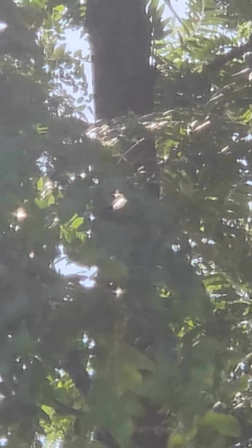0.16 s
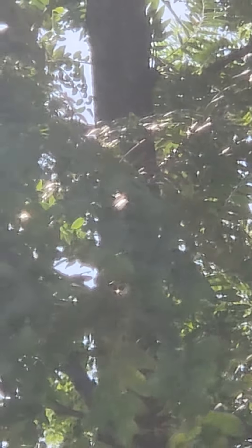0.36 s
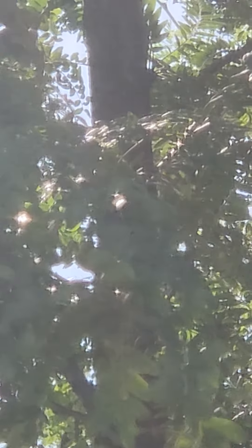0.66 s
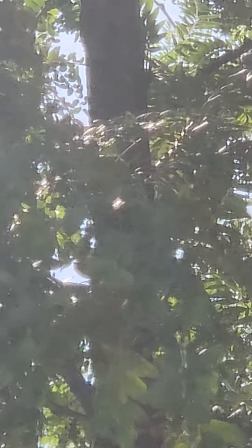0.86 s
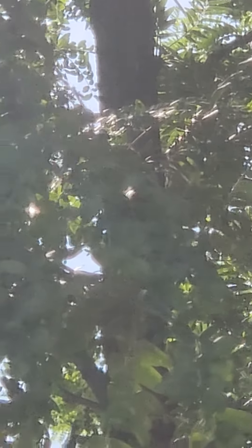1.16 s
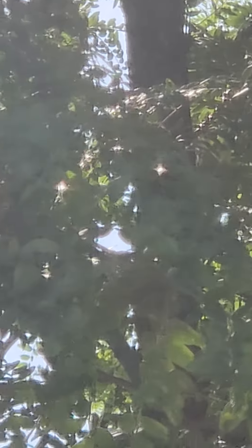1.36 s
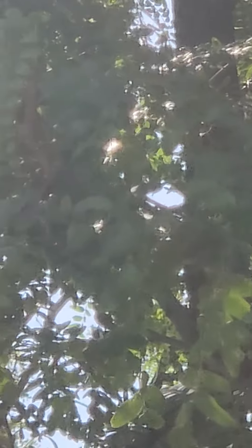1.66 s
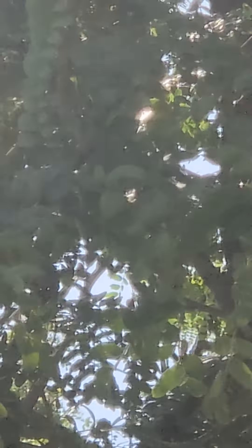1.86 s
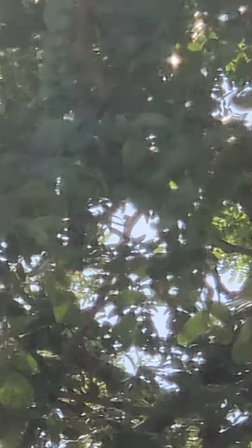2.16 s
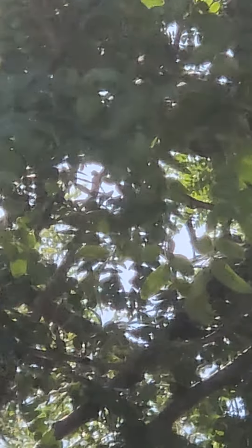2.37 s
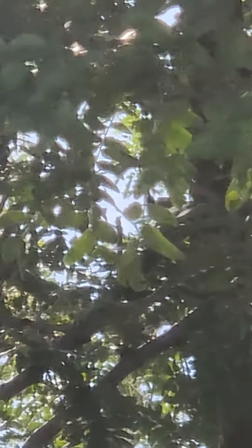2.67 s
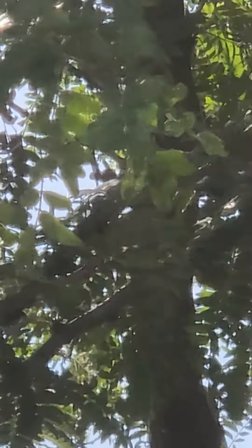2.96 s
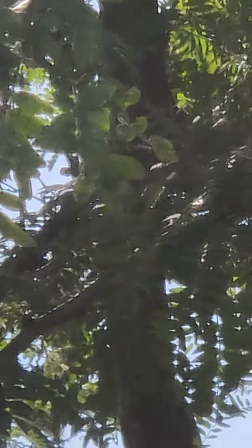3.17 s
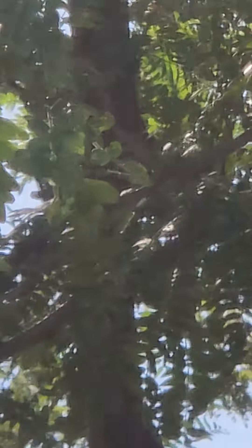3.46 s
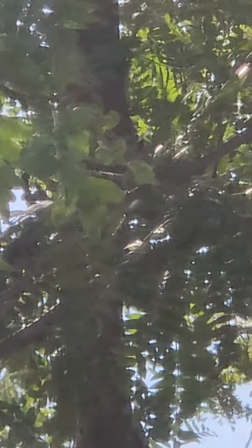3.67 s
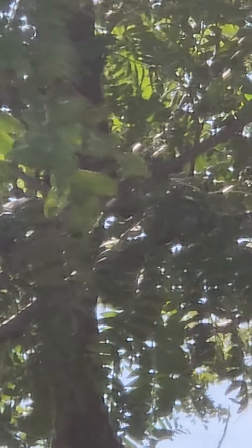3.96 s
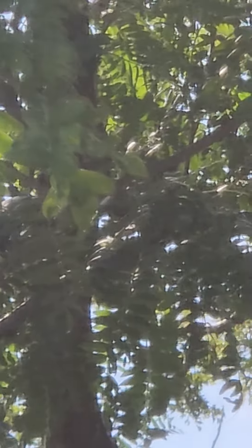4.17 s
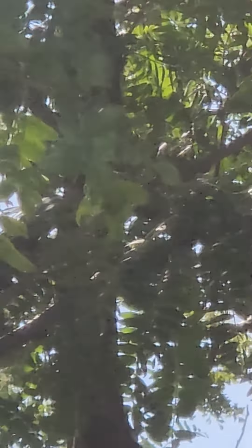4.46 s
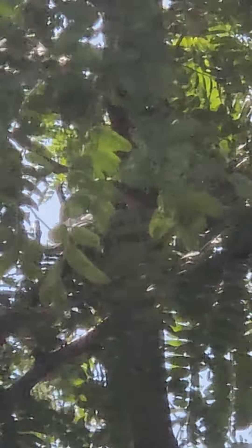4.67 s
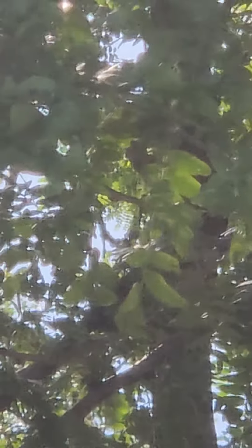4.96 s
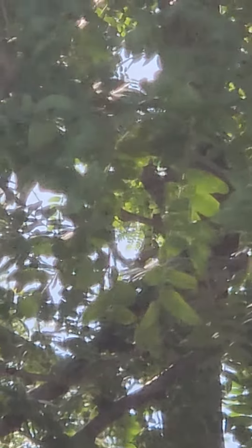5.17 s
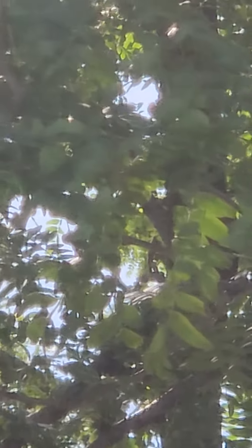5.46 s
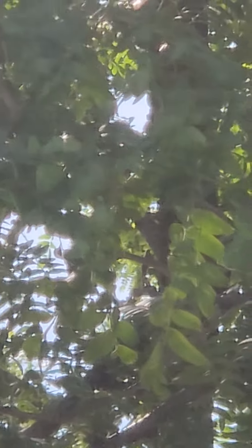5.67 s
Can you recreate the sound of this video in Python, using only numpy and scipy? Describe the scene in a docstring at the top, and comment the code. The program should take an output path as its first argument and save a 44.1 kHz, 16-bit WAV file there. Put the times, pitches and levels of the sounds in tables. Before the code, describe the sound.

A jay screams four times close by, harsh and nasal, over faint pulsing insects and a distant traffic rumble in a wood.

```python
"""Insects pulse and a far bird calls in the foliage over a distant traffic rumble, heard in stereo in a wood.
A second in, a blue jay close to the microphones gives the first of four screams. Each scoops up into a
nasal whistle (the second harmonic in the throat resonance), sags, and breaks into a rasp as the pulses
of the syrinx fall into disorder. Twigs, leaves and trunks scatter the calls back.
At the microphones a sleeve rustles and ticks faintly as the listener turns."""
import sys
import numpy as np
from scipy import signal
from scipy.fft import rfft, irfft, next_fast_len
from scipy.io import wavfile
from scipy.ndimage import uniform_filter1d, minimum_filter1d, map_coordinates

SR = 44100
rng = np.random.default_rng(int(sys.argv[2]) if len(sys.argv) > 2 else 0)


def pcm_store(signal):
    """Save signal as 16-bit PCM."""
    levels = np.round(np.clip(np.atleast_2d(signal), -1, 1) * 32767)
    wavfile.write(sys.argv[1], SR, levels.astype(np.int16).T)


N = 256220
T = np.arange(N) / SR

# One row a scream: (start [s], length [s], top pitch [Hz], sag [Hz], sag after [s],
# pulses group in fours after [s], voice breaks after [s], added roughness [0-1], relative rasp [dB],
# relative sizzle [dB], sizzle swell [dB], swell peaks after [s], fundamental [dB])
JAY_SCREAMS = [(1.06, 0.42, 1639, 29.55, 0.13, 0.06, 0.25, 0.31, -30, -28, 8, .26, -34.5),
               (2.85, 0.37, 1648, 40.4, 0.18, .22, 0.24, 0.87, -32, -28, 5, 0.27, -34),
               (3.579, 0.38, 1637, 36, .194, 0.12, .19, 0.73, -27.5, -23, 5, 0.24, -27.5),
               (5.42, .380, 1668, 54.4, 0.13, .205, 0.24, 0.65, -30, -23, 2.5, 0.18, -29.5)]
# The whistle, one curve a scream: (time [s], relative level [dB])
WHISTLE_CURVES = [
    [(1.079, -15), (1.095, -12.5), (1.235, -14), (1.247, -7.5), (1.399, -19.5), (1.427, -12.5),
     (1.469, -15.5)],
    [(2.869, -13.5), (2.883, -2.5), (2.907, -20.5), (2.961, -10), (3.081, -17), (3.149, -10), (3.209, -16)],
    [(3.597, -13), (3.605, -7), (3.627, -7), (3.787, -13), (3.849, -20.5), (3.881, -13.5), (3.953, -18)],
    [(5.439, -10.5), (5.523, -8), (5.593, -15.0), (5.681, -8.5), (5.707, -18), (5.755, -6.5), (5.793, -16)],
]
# Treble of each scream, set by the gape and aim of the beak: (frequency [Hz], gain [dB])
BEAK_1 = [(3700, 1), (4200, 1.5), (4700, -1.5), (5250, -6.5), (5750, -5.5), (6250, -4.5), (6900, -7),
          (7600, -2.5), (8400, -8), (9400, -8), (11000, -13.5), (13000, -15.5), (15500, -22)]
BEAK_2 = [(3700, 8), (4200, 3), (4700, 2.5), (5250, -10), (5750, -6), (6250, -7), (6900, -8), (7600, -8.5),
          (8400, -10.5), (9400, -7), (11000, -16), (13000, -14), (15500, -15)]
BEAK_3 = [(3700, 12.5), (4200, 1.5), (4700, 1.5), (5250, -4.5), (5750, -10), (6250, -13), (6900, 2),
          (7600, -2.5), (8400, 4.5), (9400, -7), (11000, -6), (13000, -12.5), (15500, -13.5)]
BEAK_4 = [(3700, 1.5), (4200, 0.5), (4700, -11), (5250, -8), (5750, -14), (6250, -7), (6900, -4),
          (7600, -2.5), (8400, -1), (9400, -6.5), (11000, -13), (13000, -14.5), (15500, -19.5)]
# Each scream at the microphones; pan is left over right, lag is on the right:
# (whistle pan [dB], rasp pan [dB], sizzle pan [dB], rasp and sizzle lag [ms], whistle lag [ms])
JAY_BEARINGS = [(0, -4.5, -4, .162, .145), (-7, -5.5, -2.5, .231, .14), (-8, -3.5, -7, .231, .12),
                (-12, -2.5, -7.5, .231, .18)]
def jay():
    """A jay in a tree close by screams four times, its beak aimed a little differently each time."""
    calls = zip(JAY_SCREAMS, WHISTLE_CURVES, [BEAK_1, BEAK_2, BEAK_3, BEAK_4], JAY_BEARINGS)
    return sum(jay_call(*call) for call in calls)


# Resonance of the throat around the whistle: (frequency [Hz], gain [dB])
THROAT_COLOUR = [(1000, -43.5), (1450, -9.5), (1650, -8), (1850, -15), (2050, -0.5), (2400, 4.5),
                 (2750, 0.5), (3200, -4.5)]
# Shading of the sizzle at the left microphone: (frequency [Hz], gain [dB])
LEFT_MIC_SHADE = [(6500, 3.5), (8500, -3), (10000, -6), (12500, 0.5)]
def jay_call(scream, whistle_curve, beak, bearing, yelp_s=.012, yelp_drop=.26, attack_s=.003,
             release_s=.004):
    """The second harmonic whistles in the throat resonance; other partials rasp and sizzle around it."""
    (start, length, top_hz, sag_hz, sag_at, split_at, break_at, roughness,
     rasp_db, sizzle_db, swell_db, swell_at, root_db) = scream
    whistle_pan, rasp_pan, sizzle_pan, lag_ms, whistle_lag_ms = bearing
    span = np.arange(int(start * SR), min(int((start + length + .05) * SR), N))
    age, size = T[span] - T[span[0]], len(span)
    # even pulses in the yelp; after a brief catch they group in twos, then fours, then fall into disorder
    yelp = step((yelp_s - age) / .0025)
    catch = np.exp(-((age - .021) / .019) ** 2)
    split = step((age - split_at) / .008)
    broken = step((age - break_at) / .015)
    chaos = np.clip(.02 + .4 * catch + .12 * split + roughness * broken, 0, 1)
    twos = .55 * (1 - yelp)
    fours = .75 * split * (1 - .58 * broken)
    # the pitch shoots up as the membranes tighten, and trembles more as the voice breaks
    pitch = jay_pitch(age, length, top_hz, sag_hz, sag_at) * (1 - yelp_drop * yelp)
    pitch *= 1 + .0032 * drift(18.61, size) + .012 * chaos * drift(150, size)
    phase = 2 * np.pi * np.cumsum(pitch) / SR
    fade_db = 8 * np.clip(1 - (length - age) / .03, 0, 1)
    # the whistle blooms as the yelp reaches the throat resonance
    whistle_db = in_time(whistle_curve, T[span]) + .74 - 18.5 * yelp - 2.5 * chaos - fade_db / 2
    rasp_db = rasp_db + 7.5 * chaos - .5 * np.exp(-age / .086) - fade_db
    # the sizzle swells as the beak opens widest
    gape = np.exp(-((age - swell_at) / .1) ** 2)
    sizzle_db = sizzle_db + swell_db * gape - 4.3 * yelp - 1.3 * fade_db
    for level_db in (whistle_db, rasp_db, sizzle_db):
        level_db += .82 * drift(25, size)   # each flutters on its own
    grit = .5 * chaos * (drift(160, size) + 1j * drift(160, size))
    second_harmonic = np.exp(2j * phase)
    whistle = from_db(whistle_db) * evened(np.real(second_harmonic * (1 + grit)))
    partials = colour(syrinx(phase, twos, fours, chaos), list(THROAT_COLOUR) + list(beak))
    # take out the second harmonic, so the other partials swell independently of it
    partials -= 2 * np.real(second_harmonic * uniform_filter1d(partials / second_harmonic, size=220))
    rasp = colour(partials, [(5000, 0), (5300, -6), (5700, -40), (6500, -80)])
    sizzle = twigs(partials - rasp, echo=.36)
    fundamental = from_db(root_db - fade_db) * (1 - yelp) * np.sqrt(2) * np.cos(phase + 1)
    yelp_ring = from_db(-23) * yelp ** 2 * np.sqrt(2) * np.cos(4 * phase)
    # a whistle that favours one microphone reaches both once it breaks
    voice = place(whistle, whistle_pan * (1 - .91 * broken), whistle_lag_ms)
    voice += place(fundamental, pan_db=1.5, lag_ms=.23)
    voice += place(yelp_ring, rasp_pan, lag_ms)
    for mic in (0, 1):   # each by its own path through the twigs
        scattered_rasp = from_db(rasp_db + 3.5) * evened(twigs(rasp, echo=.33))
        scattered_sizzle = from_db(sizzle_db + 1.8) * evened(twigs(sizzle, echo=.28))
        treble = place(scattered_sizzle, sizzle_pan, lag_ms)[mic]
        voice[mic] += place(scattered_rasp, rasp_pan, lag_ms)[mic]
        voice[mic] += treble if mic else colour(treble, LEFT_MIC_SHADE)
    out = np.zeros((2, N))
    out[:, span] = voice * np.clip(age / attack_s, 0, 1) * np.exp(-np.maximum(age - length, 0) / release_s)
    return out


def jay_pitch(age, length, top_hz, sag_hz, sag_at, overshoot_hz=39, glide_hz_per_s=230, droop_hz=68.2):
    """The note overshoots in a dying wobble, glides down, sags in mid-call and droops at the end."""
    wobble = overshoot_hz * np.exp(-age / .048) * np.cos(2 * np.pi * (age - .052) / .067)
    sag = sag_hz * step((age - sag_at) / .014)
    droop = droop_hz * np.exp(-np.maximum(length - age, 0) / .0232)
    return top_hz + wobble - glide_hz_per_s * age - sag - droop


def syrinx(phase, twos, fours, chaos, flutter_hz=380, slip=.68, harmonics=10):
    """One pulse a cycle; pulses alternate in twos and fours, then turn irregular in strength and timing."""
    size = len(phase)
    sway = twos * np.cos(phase / 2 + chaos * drift(130, size))
    sway += fours * np.cos(phase / 4 + chaos * drift(90, size))
    strength = 1 + sway + 1.15 * (chaos + .03) * drift(flutter_hz, size)
    timing = phase + slip * chaos ** 1.5 * drift(flutter_hz, size)
    pulses = strength * sum(np.cos(k * timing) for k in range(1, harmonics + 1))
    return windpipe(windpipe(pulses, trip_samples=13), trip_samples=7)


def windpipe(x, trip_samples, reflection=.52):
    """Each pulse bounces in a short tube and is spread out without changing colour."""
    loop = np.r_[1, np.zeros(trip_samples - 1), reflection]
    return signal.lfilter(loop[::-1], loop, x)


def twigs(x, echo, latest_ms=2.5, sway_ms=.087, count=4):
    """Echoes off twigs by the perch shift as the bird bobs, so single partials swell and fade."""
    delays_ms = [rng.uniform(.395, latest_ms) + sway_ms * drift(7.18, len(x)) for _ in range(count)]
    return x + sum(echo * (-1) ** k * delayed(x, ms) for k, ms in enumerate(delays_ms))


def woodland(x, leaves_db=-20, leaves_t60=.31, trunks_t60=1.15):
    """Near leaves scatter the sound at once; farther trunks return a faint, duller tail."""
    t = T[:SR]
    near = rng.standard_normal((2, SR)) * from_db(-60 * t / leaves_t60) * (t > .002)
    far = rng.standard_normal((2, SR)) * from_db(-60 * t / trunks_t60) * (t > .02)
    near, far = [rms_one(tail) / np.sqrt(SR) for tail in (near, far)]
    trunks = colour(far, [(1500, -23), (2400, -25), (3200, -28.5), (5000, -30), (8000, -38), (15000, -46)])
    return signal.fftconvolve(x, from_db(leaves_db) * near + trunks, axes=1)[:, :N]


# Last and strongest chirp of each of the near insect's phrases: (time [s], level [dB])
INSECT_PHRASES = [(0.096, -56), (0.407, -51), (.701, -52.5), (1.009, -54.5), (1.619, -51), (2.218, -54.5),
                  (2.501, -51.5), (2.791, -48.5), (3.522, -48.5), (4.288, -50), (4.596, -50),
                  (4.888, -51.5), (5.216, -54)]
def insects(spacing_s=.043, swell_db=1.2, answer_db=-61):
    """In the foliage a near insect chirps in swelling threes; two higher ones pulse at their own pace."""
    out = np.zeros((2, N))
    for at, level_db in INSECT_PHRASES:
        for k in range(3):   # counting back from the last chirp
            hz = 4560 + 20 * k + rng.normal(0, 45)
            stroke = chirp(at - k * spacing_s, hz, fall_hz=rng.uniform(200, 520), length=.036, blur=1.05)
            out += from_db(level_db - swell_db * k + rng.normal(0, 1)) * stroke
    # farther neighbours chirp at random
    for at, spread_db in rng.uniform([0, -3], [T[-1], 3], (45, 2)):
        out += from_db(answer_db + spread_db) * chirp(at, hz=4600, fall_hz=250, length=.029, blur=.43)
    for first, period, hz, level_db in [(.035, .0755, 7480, -63), (.045, .088, 6230, -74)]:
        for at in np.arange(first, T[-1], period):
            out += from_db(level_db + rng.normal(0, 1.5)) * chirp(at, hz, fall_hz=170, length=.038, blur=.8)
    return out


# Peaks of the sleeve's rubs: (time [s], level [dB], 20 dB rise [s], 20 dB fall [s])
SLEEVE_RUBS = [(2.24, -60, 0.091, 0.16), (2.76, -61.5, 0.47, 0.46), (4.641, -50.5, 0.31, 0.4)]
# Hiss of sliding cloth: (frequency [Hz], gain [dB])
CLOTH_COLOUR = [(1200, -30.5), (2500, -1), (5000, -4), (8000, 3), (10000, -7.5), (14500, 1), (16000, -4)]
# Catches of the cloth: (time [s], relative level [dB])
SLEEVE_TICKS = [(1.983, -34.5), (2.033, -32), (2.1844, -50), (2.212, -26), (2.2262, -36)]
def sleeve(tick_db=-12, tick_t60=.1, grain_db=.5, plateau=2.34):
    """Close to the microphones, cloth slides with a soft grainy hiss and catches in a few ticks."""
    rubbing = sum(from_db(db - 20 * np.abs((T - at) / np.where(T < at, rise, fall)) ** plateau)
                  for at, db, rise, fall in SLEEVE_RUBS)
    hiss = stereo_noise(CLOTH_COLOUR) * rubbing * from_db(grain_db * drift(70, N))
    snaps = sum(from_db(db + tick_db - 60 * np.clip(T - at, 0, 1) / tick_t60) * (T >= at)
                for at, db in SLEEVE_TICKS)
    return hiss + snaps * stereo_noise([(500, 5), (1700, 7), (4500, -3.5), (9000, -20), (16000, -22)])


# The far bird's notes (a negative fall rises): (time [s], level [dB], pitch [Hz], fall [Hz], length [s])
FAR_NOTES = [(0.397, -54, 2260, 58, .11), (0.457, -62, 3010, -400, 0.04), (0.494, -59, 3370, 450, 0.068),
             (4.867, -57, 2290, -500, 0.063)]
def far_bird():
    """A few faint notes from deep in the wood, smeared by the trees between."""
    return sum(from_db(db) * chirp(at, hz, fall_hz, length, blur=1.14)
               for at, db, hz, fall_hz, length in FAR_NOTES)


# Traffic noise as it reaches the wood: (frequency [Hz], gain [dB])
TRAFFIC_COLOUR = [(12, -58), (20, -8), (64, 1.5), (91, -3.5), (181, -12.5), (220, -24.5), (262, -19),
                  (304, -23.5), (421, -22), (490, -25.5), (978, -26), (2220, -39), (2760, -45.5),
                  (3140, -43), (3500, -47), (4550, -61), (7700, -120)]
# Its likeness at the two microphones: (frequency [Hz], correlation [0-1])
MIC_CORRELATION = [(30, 0.93), (125, 0.94), (250, 0.93), (500, 0.72), (1000, 0.35), (3000, 0.025)]
# Its hiss, its rumble and one engine's hum: (time [s], relative level [dB])
TRAFFIC_HISS = [(0, -51.5), (2.4, -50.5), (3.3, -48), (5.8, -49)]
TRAFFIC_RUMBLE = [(0.0, -36), (0.32, -40), (0.52, -31.5), (0.63, -39.5), (1.31, -36), (1.35, -42),
                  (2.42, -37.5), (2.62, -45), (2.73, -30.5), (2.84, -40.5), (3.12, -36), (5.54, -36.5),
                  (5.62, -41), (5.8, -36)]
ENGINE_HUM = [(0, -58.5), (1.5, -56), (2.3, -48), (3.3, -55.5), (4.5, -52.5), (5.8, -56)]
def traffic(drone_hz=61, drone_db=-46, hum_hz=186, whine_hz=577, whine_db=-63):
    """Distant traffic, its bass alike at both microphones, with wavering engine tones."""
    hiss_db, rumble_db, hum_db = [in_time(curve, T) for curve in (TRAFFIC_HISS, TRAFFIC_RUMBLE, ENGINE_HUM)]
    alike = at_hz(MIC_CORRELATION, np.fft.rfftfreq(N, 1 / SR))
    width = np.sqrt((1 - alike) / (1 + alike))
    mid, side = rfft(rng.standard_normal((2, N)))
    noise = colour(irfft(mid + width * side * [[1], [-1]], N), TRAFFIC_COLOUR)
    rumble = from_db(rumble_db) * rms_one(colour(noise, [(200, -6), (300, -16), (600, -68.5)]))
    hiss = from_db(hiss_db + 3.5) * rms_one(colour(noise, [(100, -47), (190, -14.5), (270, -12)]))
    engines = np.zeros(N)
    for hz, db, rate in [(drone_hz, drone_db, 4), (hum_hz, hum_db, 7), (whine_hz, whine_db, 3)]:
        phase = 2 * np.pi * hz * T
        engines += from_db(db) * (drift(rate, N) * np.cos(phase) + drift(rate, N) * np.sin(phase))
    return (rumble + hiss + engines) * from_db([[.7], [-.7]])   # a little to the left


# Bands of the massed insects: (frequency [Hz], gain [dB])
CHORUS_COLOUR = [(2500, -4.5), (3500, -20.5), (4600, 11.5), (5400, -22.5), (6250, -7), (6700, -4.5),
                 (7500, 8), (8100, -16), (8800, -26.5), (16000, -27.5)]
def insect_chorus(level_db=-61.5, waver_db=1.2):
    """Insects all around the microphones merge into a thin, wavering hiss."""
    return from_db(level_db + waver_db * drift(2.3, N)) * stereo_noise(CHORUS_COLOUR)


def chirp(at, hz, fall_hz, length, blur):
    """A short tone that glides ever faster, blurred differently on its way to each microphone."""
    span = np.flatnonzero(np.abs(T - at) < length / 2)
    u = (T[span] - at) / length
    phase = 2 * np.pi * np.cumsum(hz - fall_hz * (u + u * u)) / SR
    out = np.zeros((2, N))
    for mic in out:
        mic[span] = np.sqrt(2) * np.cos(np.pi * u) * np.cos(phase + blur * drift(110, len(span)))
    return out


def place(x, pan_db, lag_ms):
    """Two microphones: a level difference at constant power, the right one a little later."""
    left = from_db(pan_db)
    return np.array([x * left, delayed(x, lag_ms)]) * np.sqrt(2 / (1 + left ** 2))


def delayed(x, ms):
    """The sound after a fixed or moving delay."""
    return map_coordinates(x, [np.arange(len(x)) - ms * SR / 1000], order=3)


def colour(x, points):
    """Shape a sound by a table of (frequency [Hz], gain [dB])."""
    size = next_fast_len(x.shape[-1])
    gain = from_db(at_hz(points, np.fft.rfftfreq(size, 1 / SR)))
    return irfft(rfft(x, size) * gain, size)[..., :x.shape[-1]]


def stereo_noise(points):
    """Coloured noise of level 1, independent at each microphone."""
    return rms_one(colour(rng.standard_normal((2, N)), points))


def drift(rate, size):
    """A smooth random curve of spread 1 that changes about rate times a second."""
    knots = rng.standard_normal(int(size / SR * rate * 2) + 4)
    return rms_one(map_coordinates(knots, [np.arange(size) * rate * 2 / SR + 1], order=2))


def evened(x, window=353):
    """The same sound at a steady level of 1."""
    power = uniform_filter1d(uniform_filter1d(x ** 2, window), window)
    return x / np.sqrt(np.abs(power) + 1e-12)


def in_time(curve, t):
    """A level curve read at the times t."""
    return np.interp(t, *np.transpose(curve))


def at_hz(points, hz):
    """A spectrum table read on a log-frequency axis."""
    f, value = np.transpose(points)
    return np.interp(np.log(np.maximum(hz, 1)), np.log(f), value)


def step(x):
    """A smooth rise from 0 to 1 around x = 0."""
    return .5 + .5 * np.tanh(x / 2)


def from_db(db):
    return 10 ** (np.asarray(db) / 20)


def rms_one(x):
    return x / np.sqrt(np.mean(x ** 2) + 1e-20)


def scene():
    """The close jay and its echoes over the quiet life of the wood."""
    screams = jay()
    return screams + woodland(screams) + insects() + far_bird() + sleeve() + traffic() + insect_chorus()


def record(dry, ceiling=.95, cutoff_hz=16100):
    """After the microphones, a quick limiter holds the peaks down and the top is cut steeply."""
    gain = ceiling / np.maximum(np.abs(dry).max(axis=0), ceiling)
    gain = uniform_filter1d(minimum_filter1d(gain, size=133), size=133)
    return signal.sosfilt(signal.ellip(12, .1, 80, cutoff_hz, fs=SR, output="sos"), dry * gain)


dry = scene()
out = record(dry)
pcm_store(out)
```